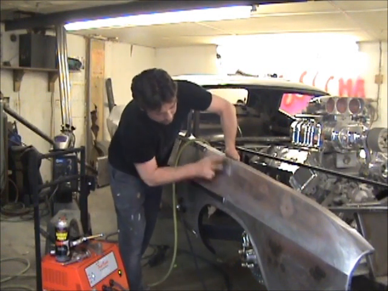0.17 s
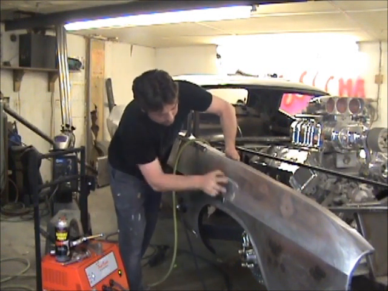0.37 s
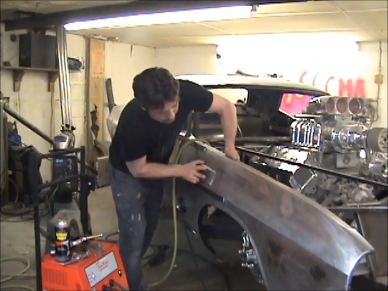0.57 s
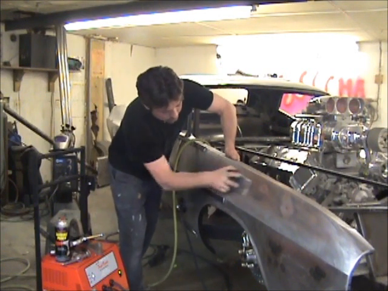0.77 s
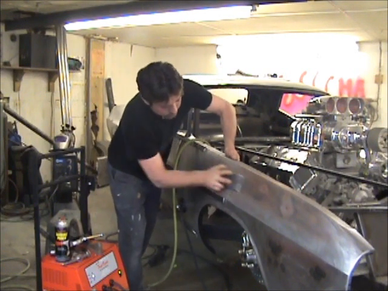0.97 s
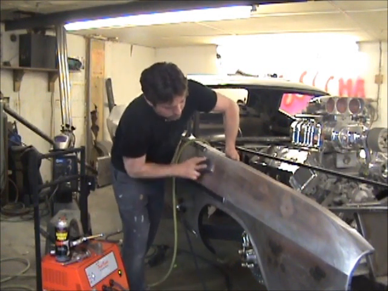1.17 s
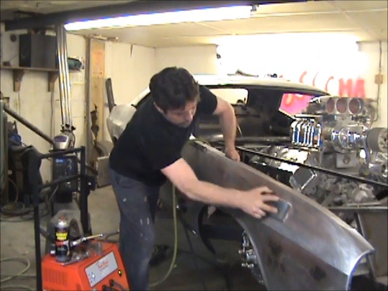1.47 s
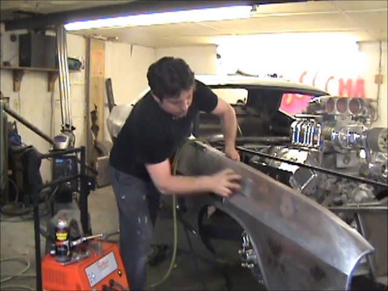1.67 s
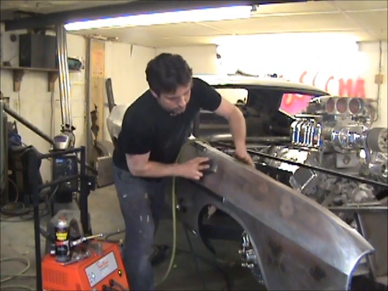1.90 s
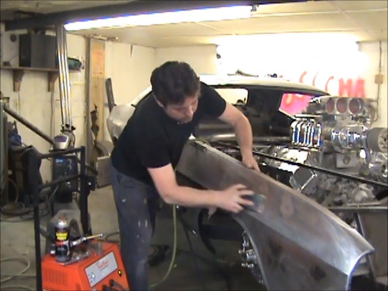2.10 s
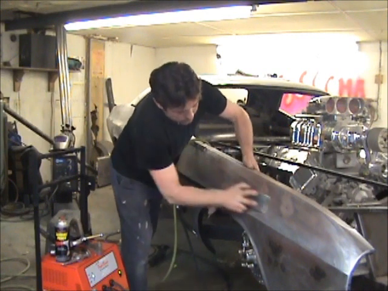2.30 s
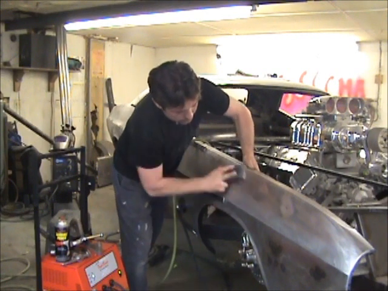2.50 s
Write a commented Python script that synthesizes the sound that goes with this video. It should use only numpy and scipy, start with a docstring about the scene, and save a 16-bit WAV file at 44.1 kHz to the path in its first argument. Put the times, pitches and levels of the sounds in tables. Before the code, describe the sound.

A sanding block rasps quickly back and forth over a bare steel car fender in a workshop

```python
"""Sanding a steel fender

A sanding block is pushed back and forth over a bare steel fender in a workshop: five short strokes, then longer ones.
Grit is dense random impulses, shaped in bands: bright at full speed, dull and throaty where the hand reverses.
The grit also keeps narrow panel resonances ringing; noise-driven bending modes boom softly around the reversals.
A short dull room tail and a steady low rumble lie behind."""
import sys
import numpy as np
from scipy import signal
from scipy.io import wavfile
from scipy.ndimage import uniform_filter1d

SR = 44100
rng = np.random.default_rng(int(sys.argv[2]) if len(sys.argv) > 2 else 0)


def dump_mix(stems):
    """Bounce the given channels to the path in sys.argv[1] as a 16-bit WAV at rate SR."""
    frames = np.atleast_2d(stems).T  # one column per channel
    limited = np.clip(frames, -1, 1)  # hard clip at full scale
    pcm = np.round(limited * 32767).astype(np.int16)
    wavfile.write(sys.argv[1], SR, pcm)


N = 116865
T = np.arange(N) / SR
LEFT_RIGHT = np.array([[1], [-1]])   # sign of the side signal in each channel


def from_db(db):
    """Decibels to gain."""
    return 10 ** (np.asarray(db) / 20)


def rms_one(x):
    """Scale to unit rms."""
    return x / np.sqrt(np.mean(x ** 2) + 1e-20)


def at_hz(points, hz):
    """Read a curve of (Hz, value) points on a log-frequency axis."""
    points_hz, values = np.transpose(points)
    return np.interp(np.log(hz), np.log(points_hz), values)


def drift(rate_hz):
    """Slow random wander with unit rms: twice-smoothed noise, drawn at every 40th sample."""
    step = 40
    r = np.exp(-2 * np.pi * rate_hz * step / SR)
    noise = rng.standard_normal(N // step + 2002)
    slow = rms_one(signal.lfilter([1], [1, -2 * r, r * r], noise)[2000:])   # skip the filter's start
    return np.interp(np.arange(N) / step, np.arange(len(slow)), slow)


def resonate(x, hz, width_hz):
    """One two-pole resonance, unit rms; a narrower one rings longer."""
    r = np.exp(-np.pi * width_hz / SR)
    ringing = signal.lfilter([1, 0, -1], [1, -2 * r * np.cos(2 * np.pi * hz / SR), r * r], x)
    return rms_one(ringing)


def place(mid, side, hz):
    """Mid and side to left and right, with a slight lean that depends on frequency."""
    # lean of the stereo picture: (pitch_hz, left_minus_right_db)
    balance = [(100, .8), (400, .8), (1400, 0), (6500, 0), (9000, -1.2), (12000, 0)]
    return (mid + side * LEFT_RIGHT) * from_db(at_hz(balance, hz) * LEFT_RIGHT / 2)


def bands(sources, edges):
    """Split two unrelated mid/side sources into stereo bands, dealt in turn; yields (centre Hz, band)."""
    # stereo width, as the gain of the side source: (pitch_hz, side_gain_db)
    width = [(60, -46), (250, -26), (700, -10), (1400, -17), (2300, -17), (6000, -13.5), (9000, -12),
             (11200, -21.5), (13000, -85), (15000, -42)]
    for k, (low, high) in enumerate(zip(edges, edges[1:])):
        band_pass = signal.butter(2, [low, high], "band", fs=SR, output="sos")
        mid, side = signal.sosfilt(band_pass, sources[k % 2])
        hz = np.sqrt(low * high)
        yield hz, place(mid, from_db(at_hz(width, hz)) * side, hz)


def hand():
    """Relative speed of the block and the level in dB that its pressure gives, through all strokes."""
    # strokes, each from one reversal to the next; the hand curves round and never quite stops:
    # (start_s, reversal_speed, top_speed, speed_up_s, slow_down_s, reversal_level_db, early_level_db,
    #  late_level_db); speeds are ratios, top_speed the ceiling of the glide
    strokes = [(-.12, 0.17, 1.08, .06, 0.029, 7, 10, 0), (.06, 0.18, 1.08, 0.046, .06, -0.5, -0.2, 0.5),
               (0.225, 0.12, 1.1, 0.062, .055, 2, 1.8, 1), (0.382, 0.15, 0.87, 0.043, 0.044, 1.3, 0.2, 1.1),
               (.55, .14, 0.69, 0.043, 0.055, 1.2, 1.4, 1.5), (.73, 0.15, 0.88, 0.053, 0.073, 2.3, 1, 0.5),
               (1.006, 0.12, 1.0, 0.089, 0.036, 0.1, 0.6, -0.6),
               (1.276, .16, 1.35, .075, .16, -.1, -0.3, -0.3),
               (1.65, 0.053, .95, .1, 0.062, -0.5, -0.6, 0.1),
               (1.999, 0.18, 0.8, 0.053, 0.061, 1.5, -0.5, 0),
               (2.36, 0.069, 1.05, 0.076, 0.066, 0.5, -1, -0.5), (2.607, .13, .8, .06, .06, 0.6, .5, 0)]
    last_stroke_s = 0.25
    level_points = np.array([0, 0.14, 0.7])   # reversal, early, late, as shares of the stroke's length

    start, turn, top, rise_s, fall_s, turn_db, early_db, late_db = np.transpose(strokes)
    end = np.append(start[1:], start[-1] + last_stroke_s)
    k = np.searchsorted(start, T) - 1   # the stroke under way at each sample
    speeding_up = np.tanh((T - start[k]) / rise_s[k])
    slowing_down = np.tanh((end[k] - T) / fall_s[k])
    glide = top[k] * speeding_up * slowing_down
    speed = np.hypot(np.interp(T, start, turn), glide)

    marks_s = start[:, None] + (end - start)[:, None] * level_points
    levels_db = np.column_stack([turn_db, early_db, late_db])
    return speed, np.interp(T, marks_s.ravel(), levels_db.ravel())


def grit(speed):
    """Dense tiny contacts of uneven size, more of them at speed, with a few lone coarse grains that crackle."""
    grains_per_s, grain_spread_db = 30000, 2   # rate at speed 1
    coarse_per_s, coarse_db = 17, 16.5         # rate at speed 1; gain over the rms of the fine grit
    sizes_db = grain_spread_db * np.minimum(rng.exponential(1, N), 4)
    sizes = from_db(sizes_db) * rng.choice([-1, 1], N)
    share = np.clip(grains_per_s * np.sqrt(speed) / SR, .01, 1)   # chance of a contact per sample
    # the root keeps the level even as the density changes
    fine = rms_one(sizes * (rng.random(N) < share) / np.sqrt(share))
    coarse = rng.random(N) < coarse_per_s * speed / SR
    return fine + from_db(coarse_db) * coarse


def speed_gain(hz, speed):
    """How the rasp at one frequency changes with the block's speed and its travel over the panel."""
    # slower contacts are longer, so they trade treble for lows: (pitch_hz, db_per_halving_of_speed)
    slowing = [(200, -1), (550, 2.5), (1250, 2), (2500, 0.46), (4600, -0.27), (7800, -2), (11400, -3.8),
               (14500, -4.5)]
    # the lows of the sheet follow the hand late: (pitch_hz, lag_s)
    follow_lag = [(300, 0.012), (1500, 0.021), (5000, 0.011), (12000, 0)]
    # bite of the middle treble, which changes as the block travels over the panel: (time_s, level_db)
    bite = [(0, 1.5), (.15, 1), (.3, -1.3), (.55, -0.5), (.66, -3), (.8, -1.5), (.95, 2.8), (1.12, -0.1),
            (1.55, 1.6), (1.8, 0), (2.2, -.5), (2.38, -2), (2.55, 1.4), (2.65, 1.5)]
    bite_hz, bite_octaves = 5030, 0.42   # centre and spread of the bell

    felt_speed = np.interp(T - at_hz(follow_lag, hz), T, speed)
    bell = np.exp(-.5 * (np.log2(hz / bite_hz) / bite_octaves) ** 2)
    bite_db = np.interp(T, *np.transpose(bite)) * bell
    return from_db(bite_db - at_hz(slowing, hz) * np.log2(felt_speed))


def rasp(speed):
    """The grit as the whole sheet radiates it: each band has its own level and follows the speed."""
    # relative spectrum at speed 1: (pitch_hz, level_db_per_hz)
    spectrum = [(140, -18.5), (243, -16.5), (390, -17), (519, -19), (702, -17.5), (1000, -13), (1400, -11),
                (2000, -7), (3000, -5.5), (4700, -2.5), (7700, 0.6), (10000, -1.5), (12500, -5),
                (15800, -12)]
    rasp_db = -12.5   # rms before the hand's pressure
    sources = [[grit(speed), rng.standard_normal(N)] for _ in range(2)]
    edges = np.append(np.geomspace(140, 5000, 15), np.linspace(6200, 16600, 8))
    out = 0
    for hz, band in bands(sources, edges):
        out = out + from_db(at_hz(spectrum, hz)) * speed_gain(hz, speed) * band
    return from_db(rasp_db) * rms_one(out)


def panel_ring(speed):
    """The panel's clearest resonances, kept ringing by the grit."""
    # panel resonances, levels before the hand's pressure: (pitch_hz, width_hz, level_db)
    resonances = [(821, 20, -55), (920, 30, -54), (1014, 25, -53), (1220, 35, -50), (1337, 30, -49),
                  (1627, 25, -46), (1868, 18, -45), (1960, 20, -43.5), (2421, 22, -44), (3941, 18, -42),
                  (4733, 32, -39.5), (4857, 55, -39), (5770, 48, -38), (7149, 80, -39), (8157, 43, -41),
                  (9031, 43, -41)]
    contacts = grit(speed)
    ring = 0
    for hz, width_hz, db in resonances:
        ring = ring + from_db(db) * resonate(contacts * speed_gain(hz, speed), hz, width_hz)
    return ring


def shaken_mode(hz, width_hz):
    """A mode kept ringing by uneven friction: noise through two resonances, mid level partly evened out; stereo."""
    side_db = -21.5

    def ringing():
        first_pass = resonate(rng.standard_normal(2 * N), hz, width_hz)
        return resonate(first_pass, hz, 2 * width_hz)

    mid, side = ringing(), ringing()
    mid = mid / np.sqrt(uniform_filter1d(mid ** 2, size=2600) + 0.085)
    return place(mid[N:], from_db(side_db) * side[N:], hz)   # the first half is run-in


def panel_boom():
    """Low bending modes swell as the block drags the panel around its reversals."""
    # swells: (centre_s, lowest_mode_db, second_mode_db, upper_modes_db)
    flexes = [(.08, -30.5, -37, -32.5), (.26, -35, -37, -36), (.39, -37, -38.5, -38),
              (.58, -33.5, -36.5, -36.5), (.79, -42, -42, -38), (.975, -38, -44, -49),
              (1.06, -43, -38.5, -44), (1.29, -45, -40, -38.5), (1.48, -57, -40, -48),
              (1.65, -36, -38, -51), (2.0, -50, -36, -48), (2.36, -45, -32.5, -36), (2.6, -44, -40, -38)]
    # two lowest bending modes: (pitch_hz, first_pass_width_hz, mid_stroke_level_db)
    low_modes = [(67.7, 13, -55), (123.6, 10.3, -42.5)]
    # upper bending modes: (pitch_hz, first_pass_width_hz, share_db)
    upper_modes = [(101, 19, -4), (153, 32, -5), (192, 36, -1.5), (240, 19, 1), (312, 20, -0.5),
                   (333.7, 5.1, -2), (390, 45, -3)]
    flex_s = 0.045   # standard deviation of one bell-shaped swell

    swells = np.zeros((3, N))
    for centre_s, *levels_db in flexes:
        bell = np.exp(-.5 * ((T - centre_s) / flex_s) ** 2)
        swells += from_db(levels_db)[:, None] * bell
    low = 0
    for (hz, width_hz, rest_db), swell in zip(low_modes, swells):
        low = low + shaken_mode(hz, width_hz) * np.hypot(swell, from_db(rest_db))
    upper = sum(from_db(db) * shaken_mode(hz, width_hz) for hz, width_hz, db in upper_modes)
    return low + swells[2] * rms_one(upper)


def workshop(x):
    """A short, dull tail from the cluttered room: convolution with decaying noise, alike in both channels."""
    t60_s, room_db, dull_hz = 0.17, -12.5, 5000
    t = T[:SR // 2]
    tail = rng.standard_normal(len(t)) * from_db(-60 * t / t60_s) * (t > .003)   # starts after 3 ms
    low_pass = signal.butter(2, dull_hz, fs=SR, output="sos")
    tail = signal.sosfilt(low_pass, tail / np.linalg.norm(tail))
    return from_db(room_db) * signal.fftconvolve(x, tail[None], axes=1)[:, :N]


def shop_rumble():
    """Steady low background of the shop: noise shaped in bands."""
    # relative spectrum of the rumble: (pitch_hz, level_db_per_hz)
    floor = [(25, -5), (45, -2), (65, -7), (100, 7), (200, -0.5), (600, -7), (16000, -52)]
    floor_db = -42
    edges = np.geomspace(22, 16000, 14)
    sources = rng.standard_normal((2, 2, N))
    rumble = sum(from_db(at_hz(floor, hz)) * band for hz, band in bands(sources, edges))
    return from_db(floor_db) * rms_one(rumble)


def scene():
    """Sanding, the panel and the room; the pressure level flutters because the paper grips unevenly."""
    flutter_db, flutter_hz = 0.46, 27   # rms depth, and bandwidth of the wander
    speed, pressure_db = hand()
    level_db = pressure_db + flutter_db * drift(flutter_hz)
    sanding = (rasp(speed) + panel_ring(speed)) * from_db(level_db)
    return sanding + workshop(sanding) + panel_boom() + shop_rumble()


def record(dry):
    """The top is cut steeply by an elliptic low-pass."""
    cutoff_hz = 15900
    return signal.sosfilt(signal.ellip(12, .1, 80, cutoff_hz, fs=SR, output="sos"), dry)


dry = scene()
out = record(dry)
dump_mix(out)
```